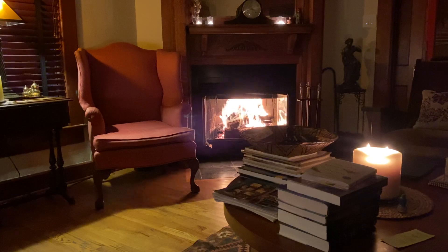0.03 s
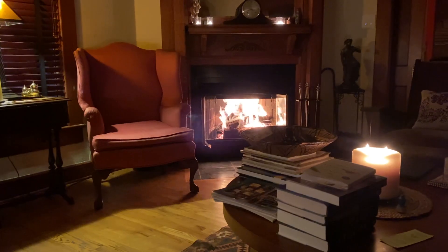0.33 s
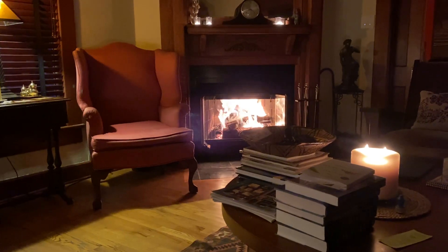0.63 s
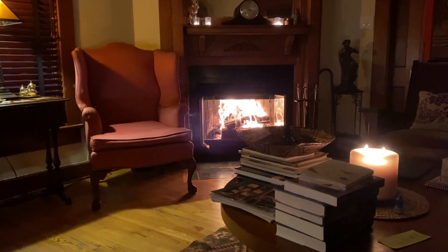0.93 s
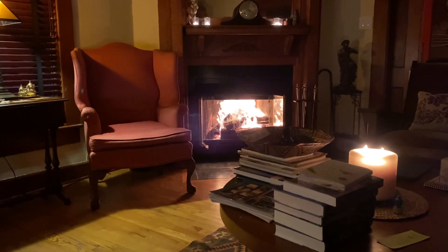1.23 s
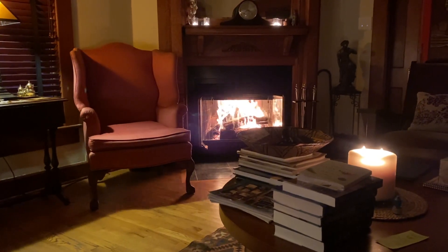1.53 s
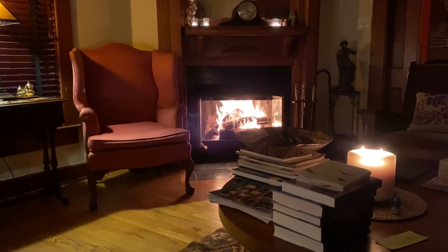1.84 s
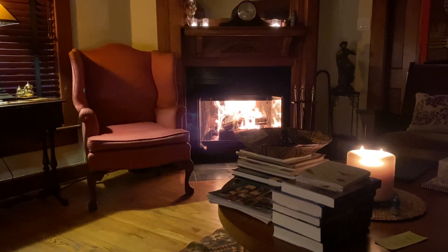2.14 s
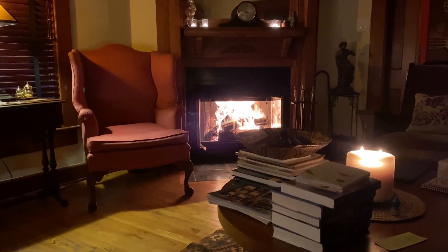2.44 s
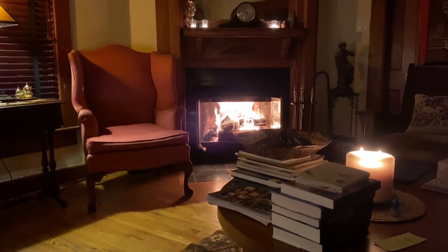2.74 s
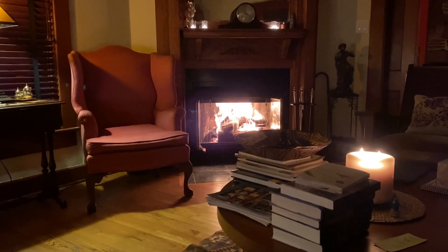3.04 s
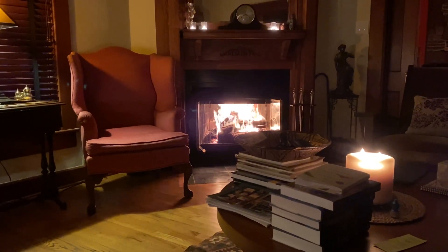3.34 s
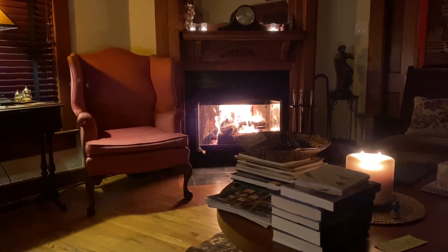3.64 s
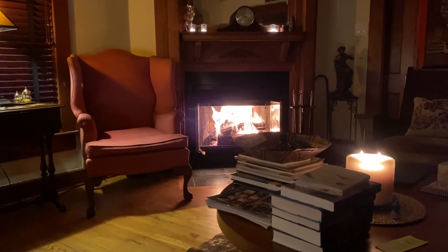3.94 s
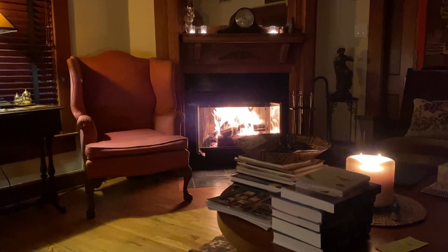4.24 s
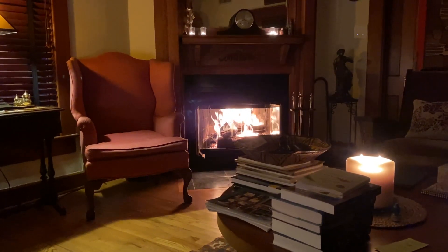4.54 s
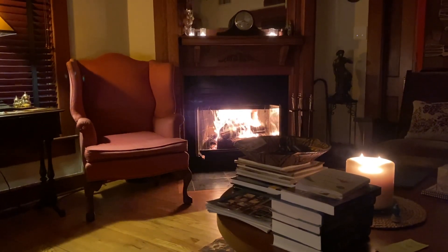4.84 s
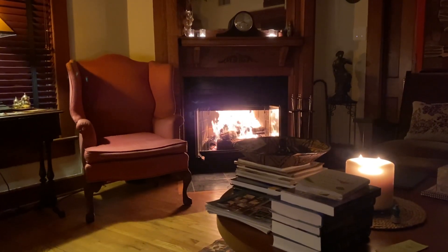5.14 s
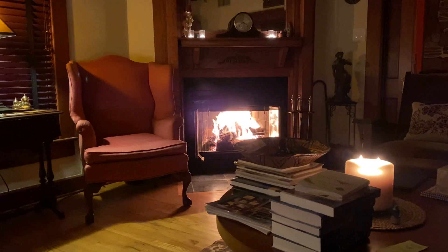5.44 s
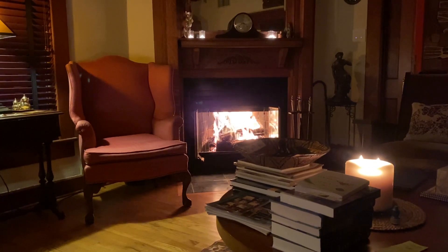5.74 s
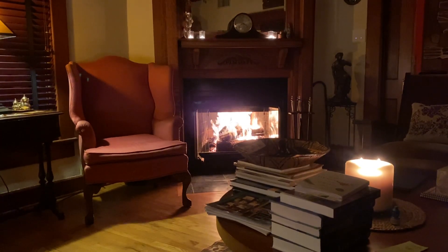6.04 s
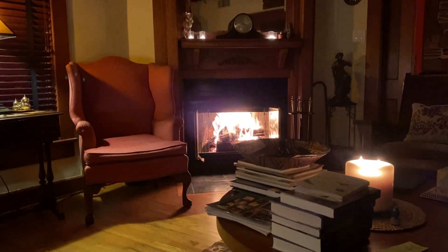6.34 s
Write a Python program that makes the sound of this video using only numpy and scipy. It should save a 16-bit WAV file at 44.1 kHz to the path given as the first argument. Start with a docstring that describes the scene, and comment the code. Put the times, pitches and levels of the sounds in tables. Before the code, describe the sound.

Dry, bright pops and snaps come at uneven intervals from logs burning in a fireplace, heard from a few metres off and a little to the left. Tiny ember ticks fill the gaps over a soft, low roar of flames. A few very faint puffs of steam escape from about halfway, and the loudest crack comes late. Each snap rings briefly in the otherwise quiet, furnished room.

```python
"""A low roar of flames fills the firebox and flue of a glass-fronted fireplace in a quiet living room.
Embers tick over a faint hiss, and the steady rumble has brief low swells.
Logs split in millisecond cracks: tearing fibres ring a splinter, and the snap rings on in the room.
Later, sap sizzles out of a log in soft puffs of steam. It is all a few metres off, a little to the left."""
import sys
import numpy as np
from scipy import signal
from scipy.fft import rfft, irfft
from scipy.io import wavfile
from scipy.ndimage import uniform_filter1d

SR = 44100
rng = np.random.default_rng(int(sys.argv[2]) if len(sys.argv) > 2 else 0)


def dump(signal):
    """Clip the signal to [-1, 1] and save it as 16-bit WAV at the path in sys.argv[1]."""
    limited = np.clip(np.atleast_2d(signal).T, -1, 1)
    pcm = np.round(limited * 32767).astype(np.int16)
    wavfile.write(sys.argv[1], SR, pcm)


N = 286650
TIME = np.arange(N) / SR
HZ = np.maximum(np.fft.rfftfreq(N, 1 / SR), 1)


def undb(db):
    """Decibels to gain."""
    return 10 ** (np.asarray(db) / 20)


def along(points, hz):
    """Read (hz, value) points on a log-frequency axis."""
    point_hz, value = np.transpose(points)
    return np.interp(np.log(np.maximum(hz, 1)), np.log(point_hz), value)


def lift(modes):
    """EQ curve in dB of a set of resonances and nulls."""
    return sum(db / (1 + (2 * (HZ - hz) / width) ** 2) for hz, width, db in modes)


def unit(x):
    """Scale to a mean energy of one per channel."""
    return x / np.sqrt(np.mean(np.sum(x ** 2, axis=-1)))


def lowpass(x, cutoff_hz, steepness):
    """Roll off the highs without shifting phase."""
    return irfft(rfft(x) / (1 + (HZ / cutoff_hz) ** steepness), N)


def drift(rate_hz):
    """Smooth random modulation with a spread of one."""
    wander = lowpass(rng.standard_normal(N), rate_hz, 4)
    return wander / np.std(wander)


def add(track, start_s, sound):
    """Mix a sound into a track."""
    i = max(int(start_s * SR), 0)
    n = max(min(sound.shape[-1], N - i), 0)
    track[..., i:i + n] += sound[..., :n]


# Stereo width of the room sound: frequency_hz, side_minus_mid_db
STEREO_WIDTH = [(30, -27), (60, -9.5), (130, -23), (250, -12.5), (500, -4.5), (1200, -3), (2200, -4),
                (5000, -8.5), (7000, -7.5), (16000, -95)]

def diffuse(density_db):
    """Stereo noise with the given dB per Hz, as two close microphones hear it in a room."""
    mid, side = rfft(rng.standard_normal((2, N)))
    width = undb(along(STEREO_WIDTH, HZ))
    pair = (mid + np.array([[1], [-1]]) * width * side) / np.sqrt(1 + width ** 2)
    return irfft(pair * undb(density_db), N) * np.sqrt(SR / 2)


# Tone of the flame bed: frequency_hz, density_db
ROAR_SPECTRUM = [(22, -91), (40, -62), (60, -61), (95, -56), (130, -66), (155, -60), (205, -61.5),
                 (265, -65), (300, -76), (375, -80), (460, -82), (700, -88), (870, -97), (1500, -101)]
# Resonances and nulls of firebox, flue and room: centre_hz, width_hz, lift_db
ROAR_MODES = [(70.5, 14.8, 8.5), (104.5, 8, -15.5), (110.7, 9.2, 11.5), (127.3, 13.3, -6.5),
              (184.7, 10, 6.5), (310.6, 14.7, 9.5), (334.35, 6.2, 16.5), (354.3, 6.3, 11.5),
              (409.4, 17.7, 11.5), (545, 104, 1.5), (663, 4.2, 5.5), (698, 2.4, 4.5), (747, 4.8, 10),
              (936, 14, 12), (1055, 7.3, 9.5), (1146, 182, 13.5), (1144, 18, 2)]
# Brief low swells in the steady rumble: peak_s, rise_db, pitch_hz
BASS_SWELLS = [(.15, 6.5, 76), (1.28, 7.5, 72.6), (1.521, 7.5, 183), (1.97, 6, 71), (2.22, 9.5, 72),
               (3.41, 7, 82.5), (3.85, 8.5, 72.5), (4.05, 8.5, 91), (4.5, 5.5, 173), (5.26, 8, 74),
               (5.92, 6.5, 72), (6.31, 6.5, 70)]

def flame_roar(bass_target_db=-35.5, swell_attack_s=0.049, swell_release_s=0.06, swell_octaves=0.73):
    """Turbulent flames drive firebox and flue; the bass wavers and briefly swells, the rest flutters."""
    rolloff_db = 20 * np.log10(1 + (HZ / 1650) ** 8)
    noise = diffuse(along(ROAR_SPECTRUM, HZ) + lift(ROAR_MODES) - rolloff_db)
    bass = lowpass(noise, 450, 8)
    target = undb(bass_target_db + 0.9 * drift(10.4))
    bass_rms = np.sqrt(uniform_filter1d(np.mean(bass, axis=0) ** 2, SR // 10, mode="wrap"))
    leveller = (target / bass_rms) ** 0.91  # rides the bass most of the way to its target
    flutter = undb(2 * drift(5.7))
    roar = (noise - bass) * flutter + bass * leveller
    bed_spectrum = rfft(roar)
    for peak_s, rise_db, pitch_hz in BASS_SWELLS:
        band = irfft(bed_spectrum / (1 + (np.log2(HZ / pitch_hz) / swell_octaves) ** 4), N)
        corners_s = [peak_s - swell_attack_s, peak_s, peak_s + swell_release_s]
        roar += band * (undb(np.interp(TIME, corners_s, [0, rise_db, 0])) - 1)
    return roar


# Tone of the hiss bed: frequency_hz, density_db
HISS_SPECTRUM = [(20, -130), (1000, -108), (1800, -108), (2600, -111), (4500, -112), (8000, -113.5),
                 (15500, -111.5), (16600, -130)]

def hiss(waver_db=0.5, flicker_db=0.6):
    """A faint, nearly even hiss with a slow waver and a quicker flicker."""
    return diffuse(along(HISS_SPECTRUM, HZ)) * undb(waver_db * drift(0.8) + flicker_db * drift(4.1))


# Modes of a splinter: pitch_ratio, lift_share
SPLINTER_MODES = [(.52, 0.42), (.71, 0.39), (1, 1)]

def splinter_snap(body_db, edge_db, pitch_hz, ring_db, knock_below_hz=1940, mode_octaves=0.07, size=512):
    """A splinter clicks and rings briefly in its modes; thick ones knock, none radiates bass."""
    hz = np.maximum(np.fft.rfftfreq(size, 1 / SR), 1)
    knock_db = 9 * max(np.log2(knock_below_hz / pitch_hz), 0)
    colour = [(200, body_db - 37), (800, body_db - 5.5 + knock_db), (1350, body_db - 5 + knock_db / 4),
              (2000, body_db), (3700, 0.21 * body_db), (5000, 0.1), (7000, -1.5),
              (11000, 0.72 * edge_db), (16000, edge_db), (18000, edge_db - 59)]
    ring = sum(share / (1 + (np.log2(hz / (ratio * pitch_hz)) / mode_octaves) ** 2)
               for ratio, share in SPLINTER_MODES)
    # minimum phase packs the energy into the attack
    cepstrum = irfft(np.log(undb(along(colour, hz) + ring_db * ring)))
    cepstrum[1:size // 2] *= 2
    cepstrum[size // 2 + 1:] = 0
    return unit(irfft(np.exp(rfft(cepstrum))))


def room_echoes(room_t60_s=0.37, treble_t60_s=0.25, firebox_t60_s=0.012):
    """A rattle in the firebox, then a gritty tail that smooths out as furnishings soak up the treble."""
    echoes = diffuse(0)
    dull = lowpass(echoes, 9500, 6)
    walls = dull * undb(-60 * TIME / room_t60_s) + (echoes - dull) * undb(-60 * TIME / treble_t60_s)
    firebox = echoes * undb(4.5 - 60 * TIME / firebox_t60_s)
    grit = undb(4.2 * drift(900) * np.exp(-TIME / 0.15))
    attack = np.minimum(TIME / 0.0022, 1)
    return unit(((walls + firebox) * grit * attack)[:, :SR // 2])


def crackle(events, ring_share, spots, size=400):
    """Bursts of tearing fibres ring splinters; each spot in the fire has its own echoes."""
    direct, sends, fibres = np.zeros((2, N)), np.zeros((spots, N)), diffuse(0)
    for k, (start_s, level_db, body_db, edge_db, pitch_hz, tear_s, echo_db) in enumerate(events):
        age = TIME[:size] / tear_s
        tear = age ** 0.25 * np.exp(-1.2 * age ** 3)  # fibres give way at once and stop abruptly
        spectrum = rfft(fibres[:, k * size:(k + 1) * size] * tear)
        # a nearly colourless burst lets the splinter set the pitch
        burst = irfft(spectrum / np.mean(np.abs(spectrum), axis=0) ** 0.8) * tear ** 0.15
        ring_db = ring_share * max(10 - 0.23 * body_db, 0)  # less body, clearer ring
        thin_snap = splinter_snap(body_db - 9, edge_db, pitch_hz, ring_db)
        crack = unit(signal.fftconvolve(burst, thin_snap[None], axes=1))
        add(direct, start_s - 0.0003, undb(level_db) * crack)
        # the room hears the crack from all sides, which evens out its colour
        full_snap = splinter_snap(body_db, edge_db, pitch_hz, 0.2 * ring_db)
        add(sends[k % spots], start_s, undb(level_db + echo_db) * full_snap)
    return direct + sum(signal.fftconvolve(send[None], room_echoes(), axes=1)[:, :N] for send in sends)


# The clearest ember ticks: start_s, level_db
CLEAR_TICKS = [(.1046, -41), (.1245, -41), (.1654, -40), (.1993, -44.5), (.2682, -42), (.3440, -43),
               (.5446, -43), (.6184, -35), (.7321, -51), (.7790, -50), (.8419, -50), (.9437, -44),
               (.9596, -38), (1.0135, -41), (1.0444, -39.5), (1.0534, -44), (1.4006, -43), (1.4106, -49),
               (1.6381, -40.5), (1.9154, -59), (2.0102, -40.5), (2.0651, -38), (2.0801, -40), (2.3265, -37),
               (2.7096, -41), (2.8204, -46), (2.9471, -41), (2.9611, -44), (2.9780, -48), (2.9920, -51),
               (3.0319, -42.5), (3.2853, -37.5), (3.3322, -40), (3.4410, -41), (3.4549, -46), (3.5358, -40),
               (3.6226, -43), (3.6575, -49), (3.7393, -46), (4.0596, -42), (4.1005, -41.5), (4.2521, -41.5),
               (4.3759, -48), (4.4038, -41), (4.5086, -42), (4.6742, -50), (4.6842, -47), (4.7330, -39),
               (4.8957, -38), (5.1611, -40), (5.1740, -49), (5.1890, -39), (5.8126, -44), (6.1109, -41),
               (6.1917, -40.5), (6.2117, -33), (6.2207, -41), (6.2666, -45)]

def ember_ticks(faint_count=330, settling_share=0.12, settling_s=0.03, tear_s=0.0004, echo_db=0.5):
    """Embers tick, a few clearly and many faintly, some as the wood settles after a crack."""
    timing, settles, parent, strength = rng.random((faint_count, 4)).T
    crack_s = np.array(LOG_CRACKS)[(parent * len(LOG_CRACKS)).astype(int), 0]
    after_crack_s = crack_s - settling_s * np.log(1 - timing)
    faint_s = np.where(settles < settling_share, after_crack_s, timing * N / SR)
    faint_db = np.minimum(-52 - 2.8 * np.log(1 - strength), -44.5)
    ticks = []
    for start_s, level_db in [*CLEAR_TICKS, *zip(faint_s, faint_db)]:
        body_db, edge_db, pitch_hz = rng.uniform(-7, 5), rng.uniform(-4, 8), rng.uniform(6100, 15500)
        ticks.append((start_s, level_db, body_db, edge_db, pitch_hz, tear_s, echo_db))
    return crackle(ticks, ring_share=0.41, spots=1)


# Splitting wood; body is the weight at 2 kHz, edge the top treble, echo the reverb send:
# start_s, level_db, body_db, edge_db, pitch_hz, tear_s, echo_db
LOG_CRACKS = [(0.2316, -33, -10, 2, 14700, 0.00038, -8), (0.2533, -32.5, 0, 5, 7350, 0.001, 0),
              (0.3508, -33, -25, -10, 7050, 0.00059, -14), (0.407, -37.5, 2, -3, 3300, .001, 4),
              (.4499, -17.5, -6, 3, 7200, 0.00071, -6.5), (0.607, -29, -5, -4.5, 3100, 0.0013, 1.5),
              (0.644, -38, 5, -5, 6030, .0008, -1), (0.8522, -31, -2, -3, 2920, 0.0011, 3.5),
              (0.8586, -31, -3, 4, 5000, 0.0009, 0), (0.8944, -33, -1, 3, 5300, .001, 4.5),
              (1.107, -34.5, -12, 8, 7040, .0008, -6), (1.1945, -15.5, -3, 2, 7100, 0.0025, 4),
              (1.3189, -36, 6, 5, 7000, 0.00058, 1), (1.3487, -31, -5, -5, 13300, 0.00054, 1),
              (1.4507, -14.5, -12, 7.5, 7600, 0.00081, -6), (1.656, -24.5, -1.5, -14, 4020, 0.0012, -5),
              (1.6911, -18.5, -4, 2.5, 5540, 0.001, 0.5), (1.8646, -36.5, 1, -1, 6900, 0.0011, 2.5),
              (1.9226, -33.5, 4, -6, 3800, 0.00064, -7), (2.0996, -17, -3, -4, 4930, .0012, 3),
              (2.387, -5.5, 0.5, 0.5, 7200, 0.0019, 0), (2.458, -15.5, -12, 3.5, 7100, 0.0021, 1),
              (2.4974, -23.5, -3, -1, 5300, 0.001, -5), (2.5423, -33, 3, -2, 7000, 0.00091, -2),
              (2.634, -30.5, 16, -2, 2900, 0.003, 4.5), (2.727, -22, 8, -3, 696, 0.00041, 3),
              (3.0802, -15.5, -3, -6, 6800, 0.0025, 1), (3.165, -21.5, 1, -9, 7300, 0.00058, -5),
              (3.264, -31, 8, 0, 7200, 0.00065, -2.5), (3.573, -35.5, -5, -2, 14000, .0005, -3),
              (3.8146, -22.5, 3.5, -7, 6200, 0.0036, 1), (3.9015, -36, -12, 1, 6000, 0.001, 3),
              (3.9674, -32.5, 0, -2, 7500, 0.0011, 1.5), (4.1759, -35, -10, 10, 15000, .0005, -3),
              (4.2433, -32.5, -1, -4, 10800, 0.00073, -2.5), (4.339, -39, 3, -3, 12000, .0007, 0),
              (4.621, -39, -14, 9, 7300, 0.00064, 4), (4.842, -34, -10, 1, 12100, .0007, 1),
              (4.9074, -15.5, -13, 4, 12000, 0.0017, 3.5), (4.9136, -7.5, -1, 6.5, 7800, 0.0015, -1),
              (4.9835, -28, -4, -4, 7000, .0007, -6), (5.0773, -28.5, -13, -2, 4770, 0.00091, 2),
              (5.255, -22.5, -4, 0, 11800, 0.00075, -1.5), (5.295, -29, -12, -1, 15000, 0.0007, -2),
              (5.3622, 2, -11, 5, 7300, 0.0018, -5), (5.4873, -41, -5, 1, 12000, .0007, -10),
              (5.5035, -34, -4, 13, 7000, .0007, -13), (5.5802, -24, 5.5, -2.5, 4270, 0.00062, 5),
              (5.6724, -29.5, -11, -1, 7000, 0.0008, 1.5), (5.6802, -28.5, 12, -5, 5600, 0.00086, -11),
              (5.754, -37.5, -18, -14, 4070, .001, -6), (5.8384, -32, -10, 2, 13400, .001, 3),
              (5.885, -17.5, -5, 2, 14300, 0.00073, -2.5), (5.9014, -33, -6, 2, 12000, .0007, -6),
              (5.9615, -39, -9, -2, 7000, .0007, 9), (5.9813, -18, -4.5, -23, 6630, 0.0014, -1.5),
              (6.1231, -37, 4, -4, 3000, 0.00083, 6.5), (6.29, -36.5, 3, -2, 7000, .001, 4.5),
              (6.299, -33, -4, -5, 4900, 0.00087, -4), (6.3373, -33.5, 6, -9, 2340, .001, 2.5),
              (6.3743, -32.5, -17, -5, 5370, 0.00057, 1), (6.4041, -33.5, -6, 3, 6400, 0.00067, 2)]

def log_cracks():
    """Logs split at a few spots in the fire, with clearly ringing splinters."""
    return crackle(LOG_CRACKS, ring_share=0.96, spots=4)


# Puffs of steam: peak_s, half_length_s, centre_hz, level_db
SAP_PUFFS = [(3.204, 0.12, 2500, -69.5), (3.26, 0.077, 4800, -68.5), (4.34, 0.094, 3500, -73),
             (4.6, 0.045, 4440, -68)]

def sap_sizzle(band_octaves=0.31):
    """Sap escapes from the logs as steam, in short soft swells of narrow-band noise."""
    puffs = np.zeros((2, N))
    for peak_s, half_length_s, centre_hz, level_db in SAP_PUFFS:
        band_db = -10 * np.log10(1 + (np.log2(HZ / centre_hz) / band_octaves) ** 4)
        jet = unit(diffuse(band_db)) * np.sqrt(N)
        swell = np.exp(-((TIME - peak_s) / half_length_s) ** 2 / 2)
        puffs += undb(level_db) * jet * swell
    return puffs


# Hollow colour of the firebox: centre_hz, width_hz, lift_db
FIREBOX_COLOUR = [(1660, 960, 2.5), (2400, 600, -0.5), (3760, 640, 0), (4520, 370, -2), (5160, 400, 0.5),
                  (6040, 540, -2)]
# Pan across the spectrum: frequency_hz, left_minus_right_db
LEFT_LEAN = [(40, 3), (130, 0.5), (250, 2.5), (600, 0.6), (4500, 2.5), (8000, 0)]

def scene():
    """The roar under cracks, ticks, hiss and steam coloured by the firebox; all a little to the left."""
    wood = log_cracks() + ember_ticks() + hiss() + sap_sizzle()
    fire_spectrum = rfft(flame_roar()) + rfft(wood) * undb(lift(FIREBOX_COLOUR))
    pan_db = np.array([[1], [-1]]) * along(LEFT_LEAN, HZ) / 2
    return irfft(fire_spectrum * undb(pan_db), N)


def record(dry):
    """The left channel lags in the treble; the sound opens after a moment of silence; the top is cut."""
    lag_s, silence_s, fade_s, top_hz = 0.000236, 0.083, 0.003, 16200
    lag_phase = 2 * np.pi * lag_s * (np.clip(HZ, 6950, 15420) - 6950)
    stereo = irfft(rfft(dry) * np.exp(-1j * lag_phase * np.array([[1], [0]])), N)
    fade_in = np.clip((TIME - silence_s) / fade_s, 0, 1)
    high_cut = signal.ellip(10, 0.2, 80, top_hz, fs=SR, output="sos")
    return signal.sosfilt(high_cut, stereo * fade_in)


dry = scene()
out = record(dry)
dump(out)
```